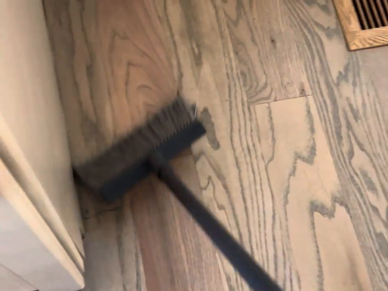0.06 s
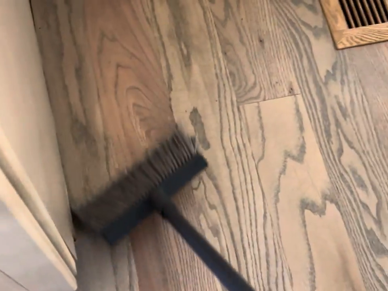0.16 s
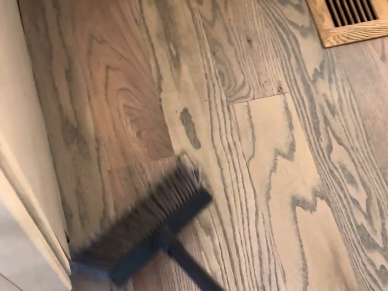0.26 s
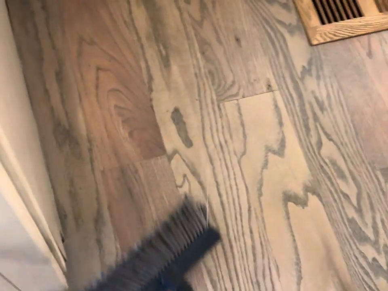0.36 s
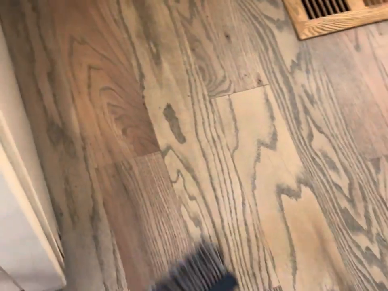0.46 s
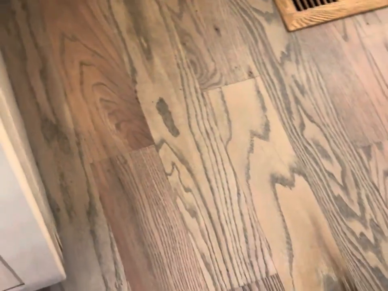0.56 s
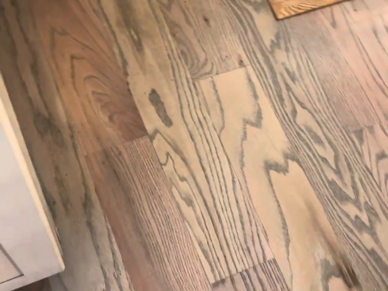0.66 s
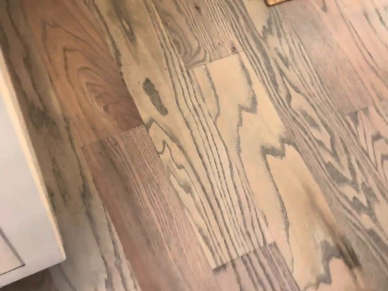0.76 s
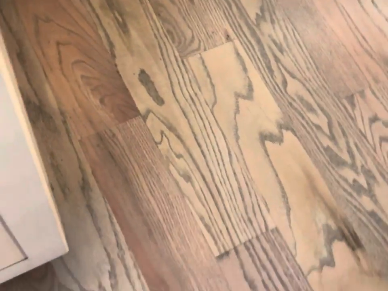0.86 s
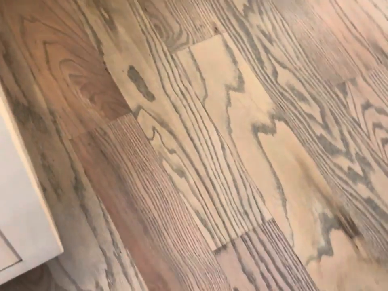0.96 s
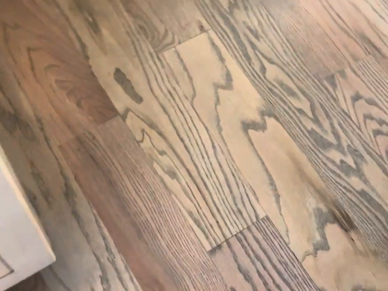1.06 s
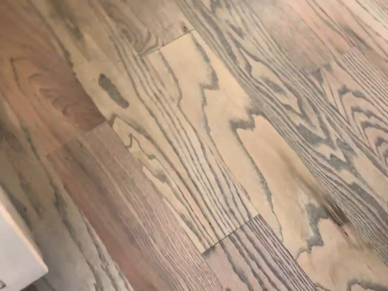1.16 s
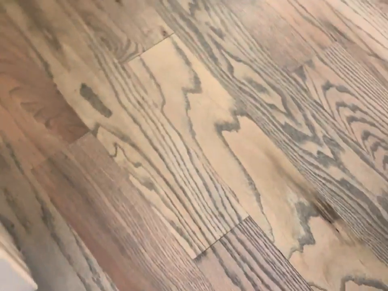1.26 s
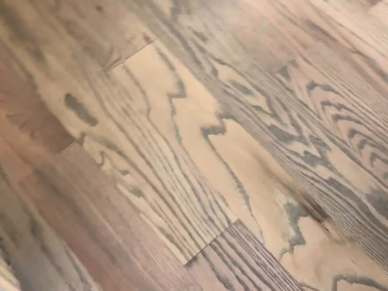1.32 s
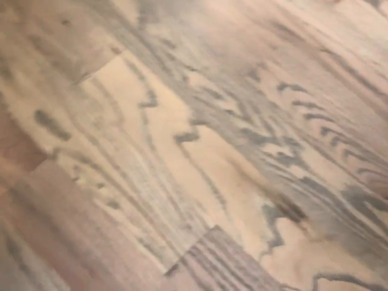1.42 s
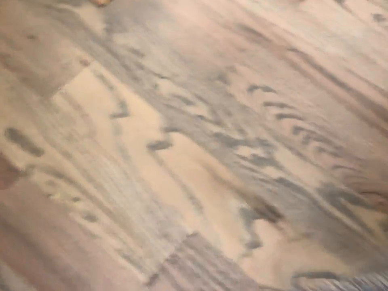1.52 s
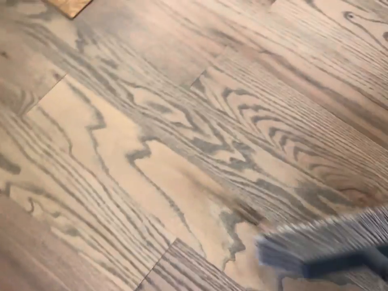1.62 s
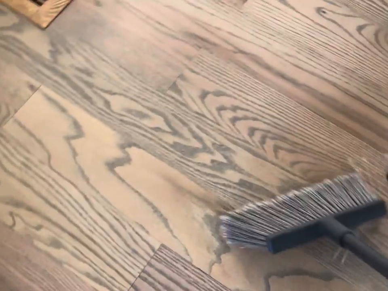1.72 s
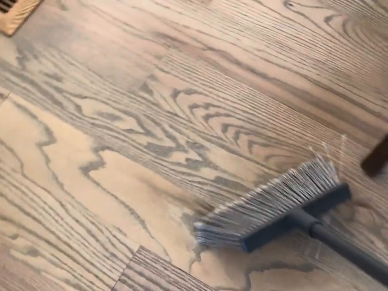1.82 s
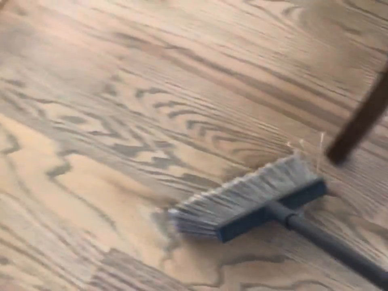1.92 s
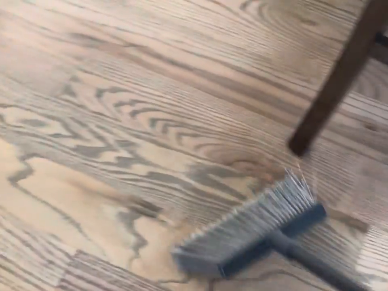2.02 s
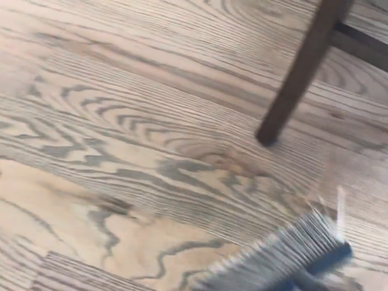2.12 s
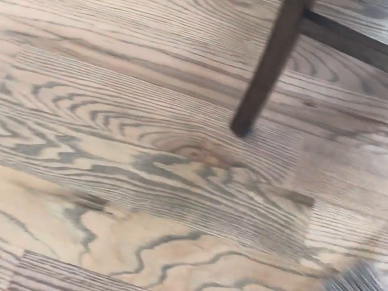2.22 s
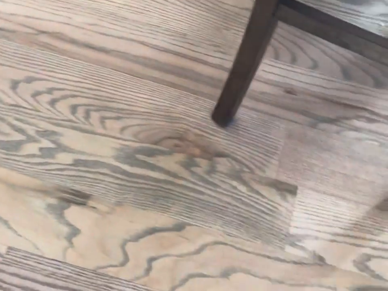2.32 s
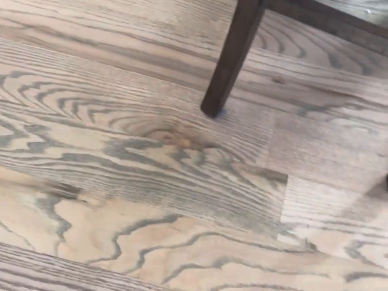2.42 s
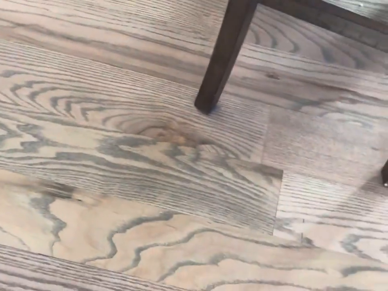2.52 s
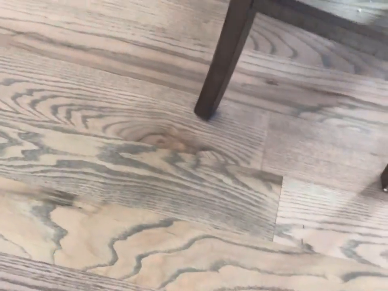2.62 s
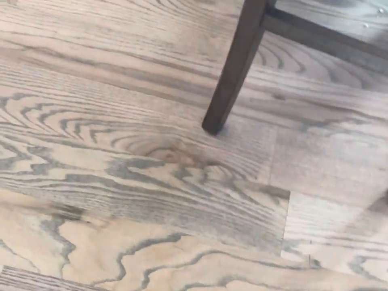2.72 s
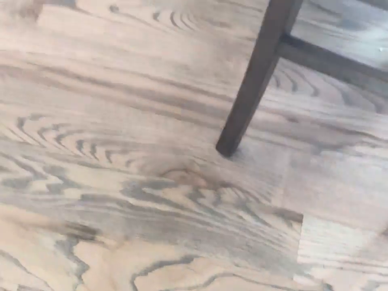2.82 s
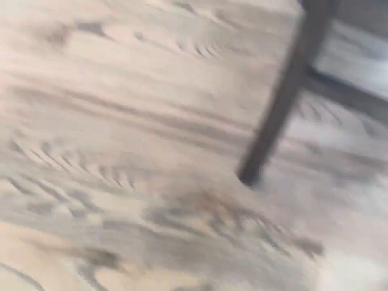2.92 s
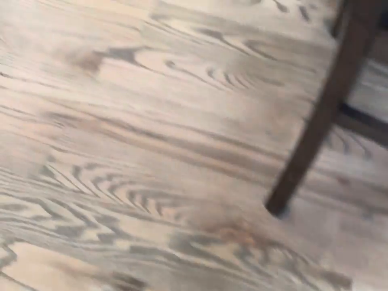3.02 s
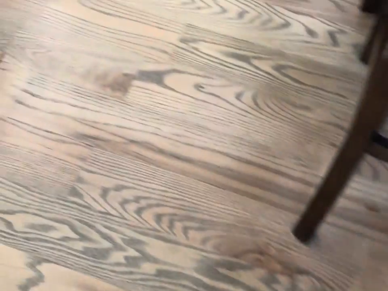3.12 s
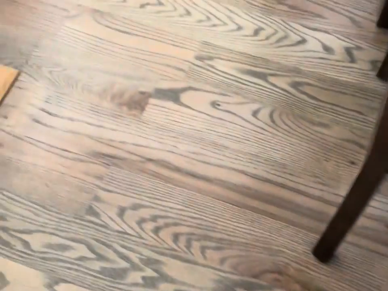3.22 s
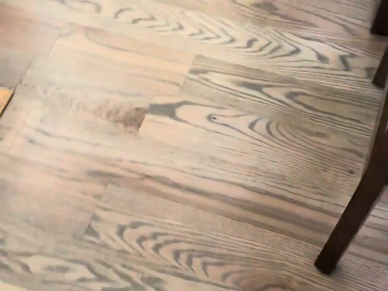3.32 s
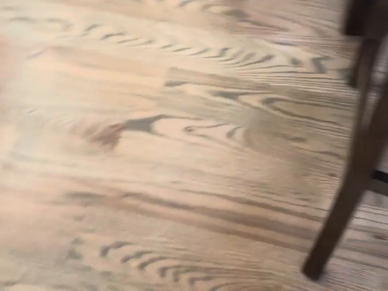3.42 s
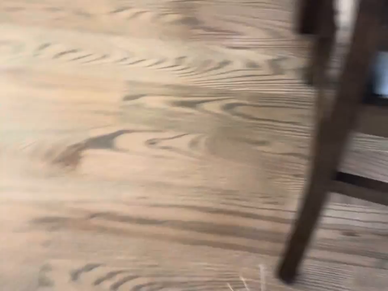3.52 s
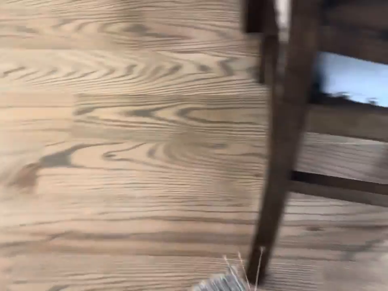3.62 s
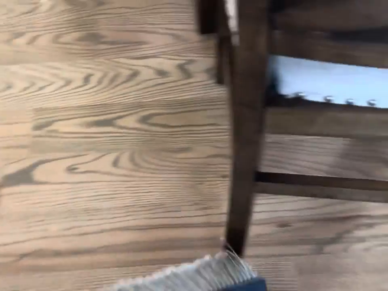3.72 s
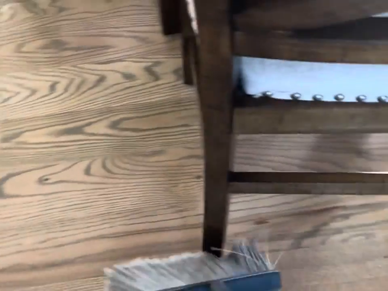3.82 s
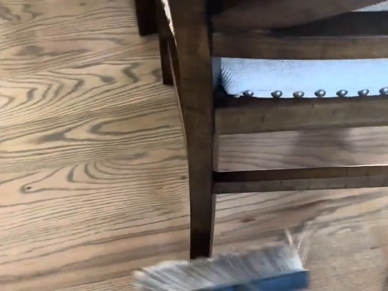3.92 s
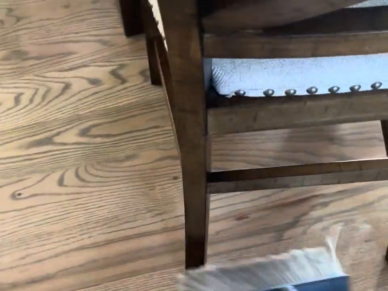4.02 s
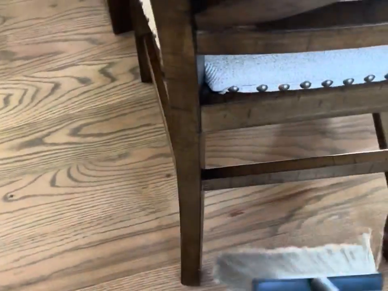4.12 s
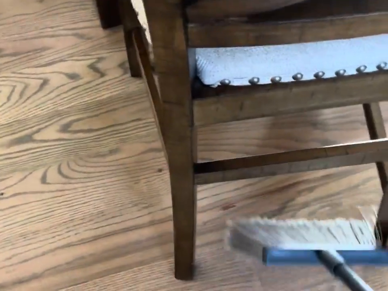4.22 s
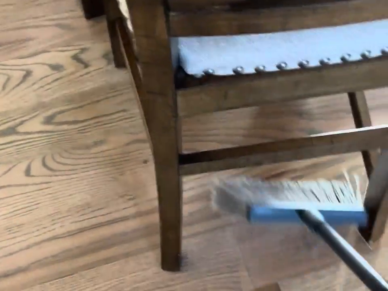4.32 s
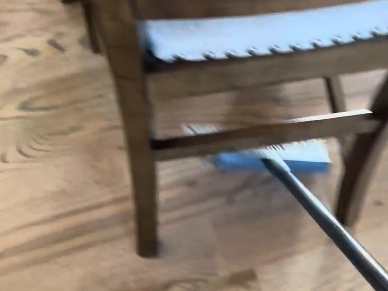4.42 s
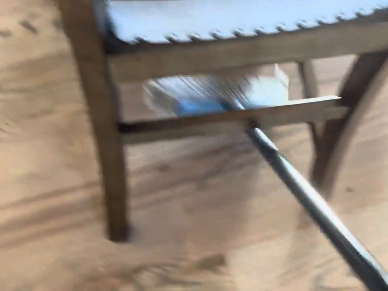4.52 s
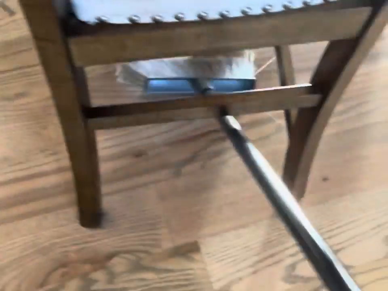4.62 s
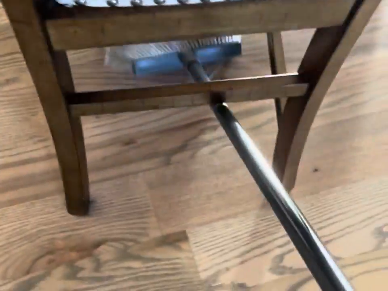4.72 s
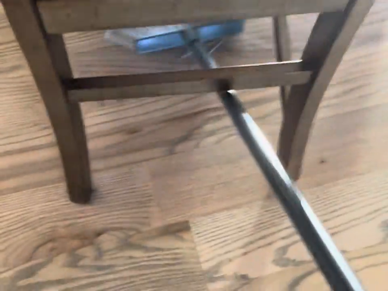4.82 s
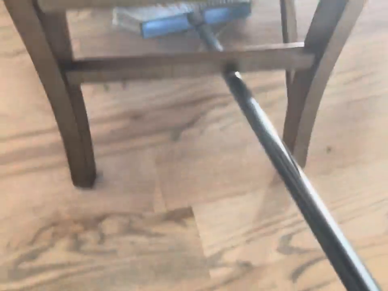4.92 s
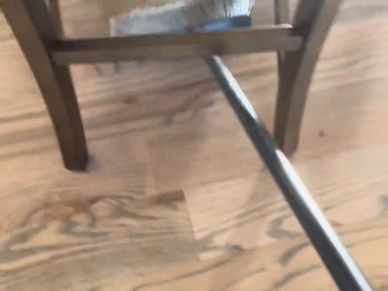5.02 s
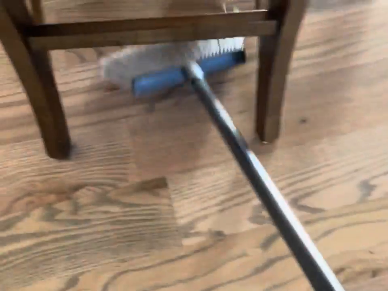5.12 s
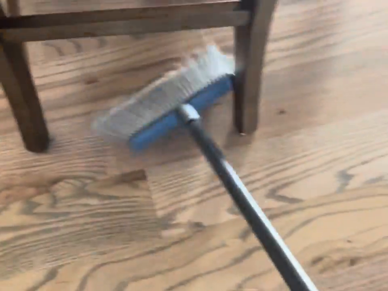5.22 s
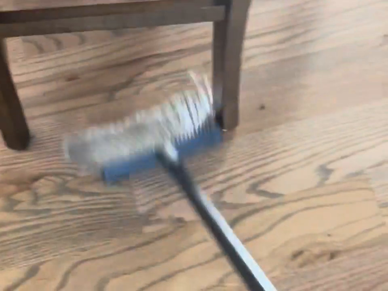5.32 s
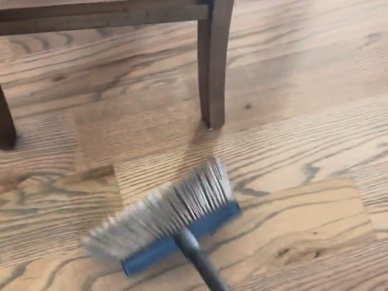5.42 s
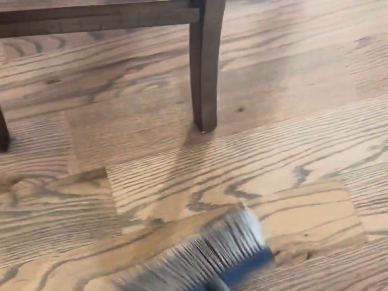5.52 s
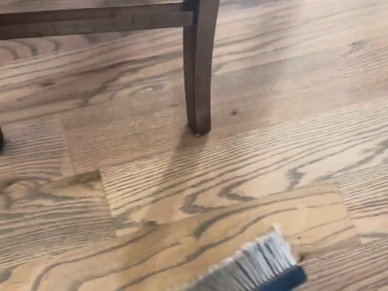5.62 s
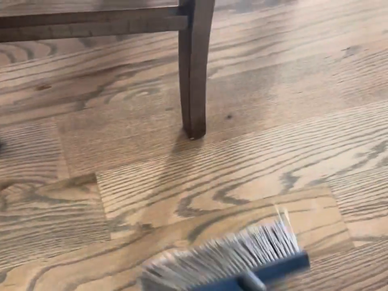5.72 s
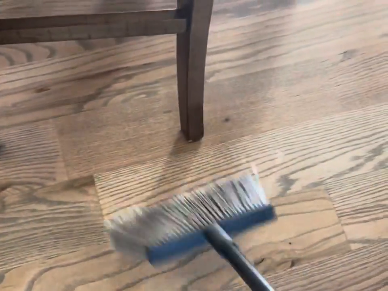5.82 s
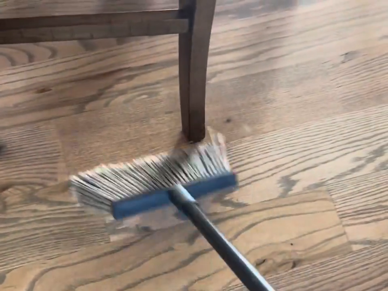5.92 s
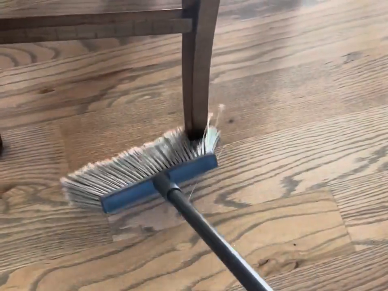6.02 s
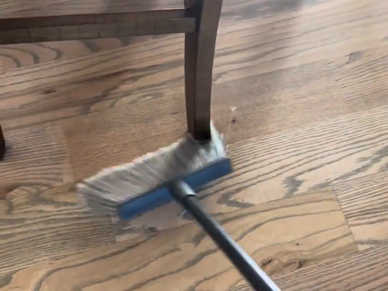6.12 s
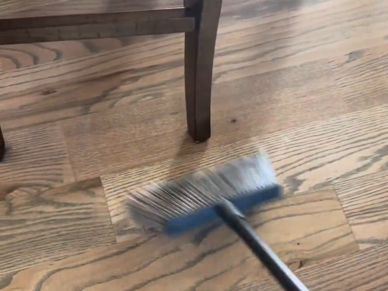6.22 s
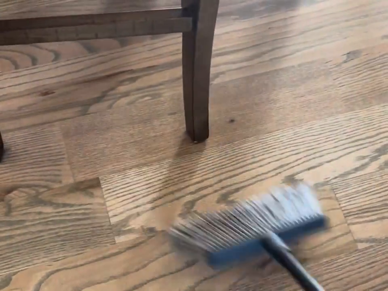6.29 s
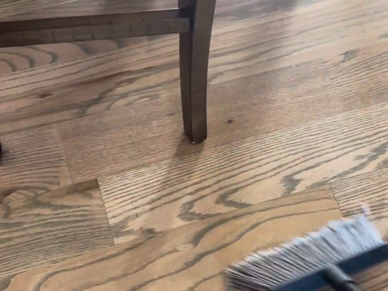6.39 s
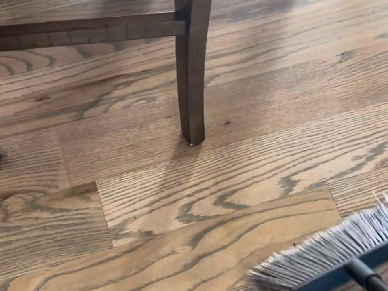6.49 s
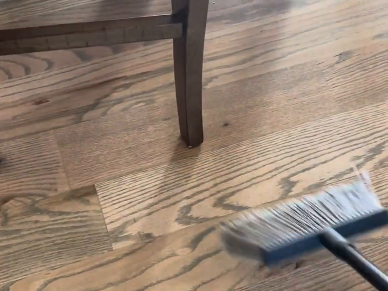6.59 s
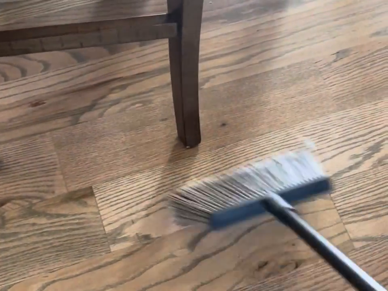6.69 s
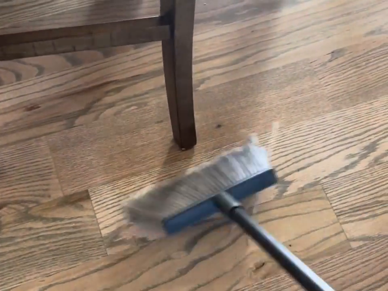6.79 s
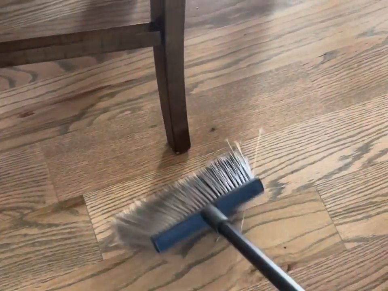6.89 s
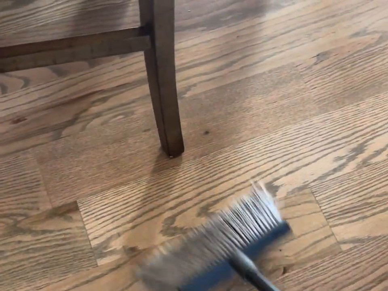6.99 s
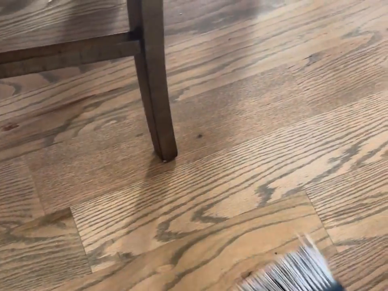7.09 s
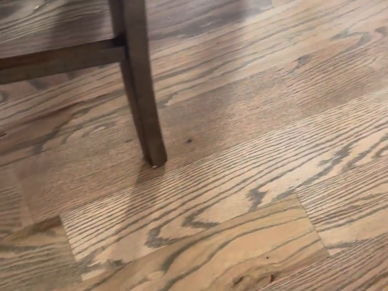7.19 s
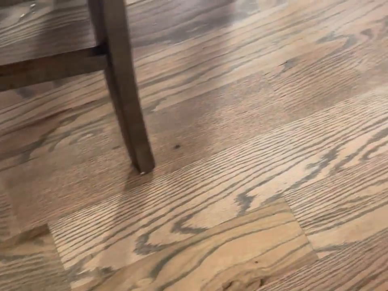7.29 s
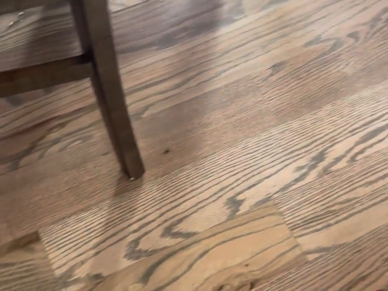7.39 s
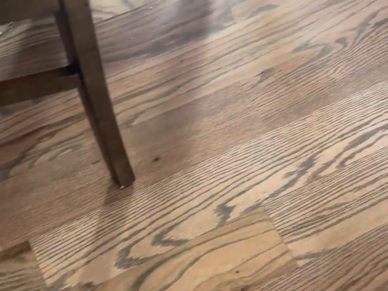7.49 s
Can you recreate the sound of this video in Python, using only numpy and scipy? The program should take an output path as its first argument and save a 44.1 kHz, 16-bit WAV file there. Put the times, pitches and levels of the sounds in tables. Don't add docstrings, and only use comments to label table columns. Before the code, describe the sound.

A soft broom swishes across a hardwood floor in short strokes, then knocks hard against a wooden chair with low booms before sweeping on.

```python
import sys
import numpy as np
from scipy import signal
from scipy.fft import rfft, irfft, next_fast_len
from scipy.io import wavfile
from scipy.ndimage import uniform_filter1d

SR = 44100
rng = np.random.default_rng(int(sys.argv[2]) if len(sys.argv) > 2 else 0)


def undo_db(level):
    steps = np.asarray(level, float) / 20
    return 10 ** steps


def generate_wav(signal):
    frames = np.transpose(np.atleast_2d(signal))
    scaled = np.clip(frames, -1, 1) * 32767
    pcm = np.round(scaled).astype(np.int16)
    wavfile.write(sys.argv[1], SR, pcm)


N = 332954
SIZE = next_fast_len(N)
HZ = np.fft.rfftfreq(SIZE, 1 / SR) + 1e-3
T = np.arange(N) / SR

# [start_s, pull_s, land_db, lift_db, lift_fade_20db_s]
DRAG_EVENTS = [(0.0, 0.2404, -65.5, -68, 0.1566), (.3, 0.647, -72, -60.5, .1),
               (1.41, 0.037, -92.5, -80.5, 0.22), (1.705, 0.0967, -73, -69.5, 0.0446),
               (1.85, 0.134, -88.5, -82, 0.01), (1.99, 0.4835, -77, -59.5, 0.095),
               (3.76, 0.0586, -91.5, -74.5, 0.1631), (4.12, 0.059, -100, -87, 0.09),
               (4.262, 0.256, -78.5, -84, 0.67), (4.5, 0.063, -84.5, -78, 0.14),
               (4.6, 0.132, -69.5, -73, 0.12), (4.955, .25, -78.5, -70, 0.0119),
               (5.29, 0.11, -76.5, -61, 0.1007), (5.45, 0.1734, -71, -71, 0.112),
               (5.93, 0.0734, -89.5, -61, 0.0757), (6.2, 0.179, -74, -71.5, .11),
               (6.93, 0.303, -76.5, -61, 0.1611)]
# [start_s, level_db, fade_20db_s, board_db]
DAB_EVENTS = [(.68, -65, 0.1256, 3), (1.03, -81, 0.61, 11.5), (1.71, -75.5, 0.1024, 11.5),
              (1.995, -80, 0.0673, 13), (2.56, -80.5, 0.3271, 11), (4.27, -85, 0.48, 11),
              (2.97, -88, 0.07, 2), (3.405, -77.5, 0.14, 7), (3.5, -83.5, 0.066, 10.5),
              (3.655, -78.5, 0.03, 9), (4.2, -92.5, 0.67, 0), (4.78, -68, 0.16, -1), (5.24, -72.5, 0.1, 10),
              (6.03, -66, 0.1821, 8.5), (0.0, -67.5, 0.3146, 9.5), (6.165, -64, 0.0468, 4.5),
              (6.63, -95, 0.1, 3), (6.73, -67.5, 0.076, 6), (6.769, -63.5, .17, 7.5),
              (6.98, -70.5, 0.1739, 8)]
# [freq_hz, density_db_per_hz]
BRISTLE_SPECTRUM = [(200, -6), (600, -0.5), (1500, 1), (3000, 3), (4500, -2), (6000, 5), (9000, -1.5),
                    (12000, -2), (16000, -4)]
HISS_DB, BOARD_HZ, SLIPS_PER_S, SLIP_SPREAD_DB = 10.5, 4450, 9000, 1.8
LAND_S, LIFT_CURVE = 0.0066, 1.715
BOARD_DB, BOARD_DB_PER_DB, BOARD_MOST_DB = 3, 0.76, 4
TRAIL_DB, TRAIL_DB_PER_S, TRAIL_BOARD_DB = -26.5, 110, 12

# [start_s, level_db, part_index, crack_db, ring_db]
CHAIR_BLOWS = [(4.5783, -14.5, 0, -27.5, -5.5), (4.606, -29, 0, -36.5, -7), (4.7426, -15.5, 1, -35, -5),
               (4.7785, -23, 1, -22, -6), (5.2255, -7, 2, -33.5, -11.5), (5.981, -52, 2, -20, -7),
               (6.0053, -33, 2, -15.5, -11.5), (6.021, -33, 1, -26, -8.5), (6.776, -38, 0, -16.5, -9),
               (3.486, -47, 2, -21, -12), (6.9865, -46, 2, -21.5, -9.5)]
# [pitch_hz, level_db, t60_s]
PART_MODES = [
    [(229.64, -11, 0.31), (436, -0.5, .07), (729, -11, 0.082), (1170.7, -4.5, 0.0397),
     (1815.6, -8.5, 0.043), (2212.5, -7, 0.0343), (2760, -10.5, 0.033)],
    [(206, -5, 0.3), (252.8, -6, 0.14), (436, 0.5, 0.098), (783.2, -6.5, 0.079), (1030.4, -9, 0.043),
     (2015, -10.5, .04), (2205, -11, .04), (3440, -18.5, .03)],
    [(187.32, -5, 0.168), (320.45, -11.5, 0.172), (587, -17, .06), (759.2, 1.5, 0.077),
     (1419.7, -10.5, 0.033), (2070.6, -5, 0.04), (3391, -12.5, .03)],
]
# [freq_hz, density_db_per_hz]
CLACK_SPECTRA = [
    [(110, -10), (150, -24), (222, 0), (340, -12), (434, 5.5), (600, -10), (741, -4), (950, -18),
     (1250, -25.5), (1800, -14), (2300, -14.5), (2800, -19.5), (4000, -29.5), (6000, -40)],
    [(110, -5.5), (150, -19.5), (222, -4), (420, 1), (800, -9), (950, -19.5), (1240, -10.5), (1550, -24.5),
     (2050, -8.5), (2800, -21.5), (3400, -23), (4900, -28.5), (6000, -37.5)],
    [(110, -7), (208, -8), (270, -12), (400, -4.5), (596, 6), (800, -4.5), (950, -6), (1500, -6.5),
     (2130, 0), (2800, -2), (3600, -7.5), (4200, -18), (5100, -17.5), (7000, -30)],
]
CONTACT_MS = [8.66, 10.5, 9.52]
# [pitch_hz, level_db, t60_s]
FRAME_MODES = [(203.6, -2, 0.48), (223.1, -3.5, 0.344), (361.16, -1, 0.35), (430.64, -1.5, .4),
               (589.6, -13, 0.33), (726.6, 3.5, 0.19), (1205, -36, 0.25), (1779, -13, .4), (2070, -22, .3)]
FRAME_DB = -26.5

# [start_s, peak_db, pitch_hz, ring_over_click_db, brightness_db]
HEAD_TAPS = [(0.5341, -48, 1097, -1, 3), (1.7119, -54.5, 571, -4, -0.5), (2.181, -53, 900, -6, -12),
             (1.8294, -53, 729, 1.5, 2), (1.9938, -50.5, 940, -5, -9.5), (2.2314, -52, 466, -7.5, -9),
             (2.7392, -61, 401, -0.5, -16.5), (3.4115, -60, 587, 4.5, -14), (3.484, -43.5, 515, -5, -20),
             (3.6594, -61.5, 484, -9.5, -15.5), (3.7912, -61, 641, -7, -3.5),
             (4.2655, -57.5, 498, -11.5, -5), (4.4971, -72, 563, -4, -10), (4.519, -55.5, 845, -3.5, -13),
             (4.9356, -41, 1850, -6, -8), (5.0228, -52, 401, -2.5, -4), (5.0831, -47, 1670, -4.5, -9),
             (5.9494, -42, 900, -8, -14), (6.726, -55, 425, -2.5, -9), (6.743, -51.5, 436, 0.5, -5.5),
             (6.776, -39, 1200, 0, -9.5), (6.8506, -46, 423.5, -2.5, -9), (6.9859, -44.5, 701, -4, -7.5)]
# [start_s, peak_db, pitch_hz, ring_over_click_db, brightness_db]
GRIT_CRACKS = [
    (0.5344, -46.5, 5350, 3, 0),
    (2.9711, -62, 3930, 3, -7),
    (3.482, -54, 3920, 3, 0),
    (4.1694, -73.5, 3860, 3, -2.5),
    (4.9346, -43, 5360, 3, -4),
    (6.6332, -55, 5490, 3, -12),
]

# [start_s, peak_db, pitch_hz, t60_s]
JOIST_BOOMS = [(0.491, -56.5, 67.5, 0.19), (1.079, -50.5, 57.7, 0.42), (1.163, -35, 55.1, 0.168),
               (1.938, -48, 52.4, 0.273), (3.418, -46, 82, 0.272), (3.539, -46.5, 63.8, 0.146),
               (4.603, -19.5, 63.4, 0.118), (4.639, -32.5, 53.13, 0.695), (4.749, -30, 84, 0.23),
               (4.841, -45, 70.44, 0.59), (4.919, -42.5, 46.2, 0.26), (5.038, -51, 52.1, 0.248),
               (5.129, -53, 48.2, 0.38), (5.249, -35.5, 91.74, 0.65), (5.27, -25, 54.97, 0.337),
               (5.389, -25.5, 53.15, 0.272), (5.559, -43, 55.5, 0.217), (5.699, -45, 55.6, 0.305),
               (5.979, -44.5, 56.5, 0.68), (6.035, -42, 41.6, 0.43), (6.039, -42, 88.7, 0.39),
               (6.169, -43.5, 57, 0.27), (6.399, -46, 53.92, 0.304)]
SWELL_CYCLES = 1.057

# [freq_hz, t60_s]
ROOM_DECAY = [(100, 0.987), (300, 0.659), (1000, 0.711), (3000, 0.674), (6000, 0.568), (15000, 0.419)]
BLOW_WET_DB, TAP_WET_DB, BRISTLE_WET_DB = -5.5, -9, -8

# [freq_hz, density_db_per_hz]
AIR_SPECTRUM = [(25, -4.5), (45, 6), (90, 0.5), (150, -5), (220, 0.5), (350, -9.5), (800, -12), (1600, -23),
                (3000, -32), (5000, -41.5), (8000, -49), (13000, -54.5), (16000, -57)]
# [time_s, gain_db]
FLOOR_TREMBLE = [(0, -0.5), (4.2, -2.5), (4.8, 5.5), (5.8, 2), (6.5, -6), (7.55, -6)]
AIR_DB, WHINE_HZ, WHINE_DB = -58, 15150, -112

# [freq_hz, likeness_0_to_1]
PORT_LIKENESS = [(60, .999), (130, .993), (300, .8), (700, .3), (1500, .75), (2200, .8), (3000, .5),
                 (4500, .3), (5300, .65), (5800, .93), (16000, .93)]
# [freq_hz, lead_half_turns]
PORT_LEAD = [(0, 0), (400, -.05), (900, -.2), (1700, -.1), (2900, .95), (4300, .25), (5300, .65),
             (5900, .95), (6500, 1.07), (8700, 1.92), (9700, 2.06), (11800, 2.93), (13300, 3.06),
             (15000, 3.95), (22050, 4.3)]


def bristles():
    pressure, board_db = strokes()
    slips = (rng.random((2, N)) < SLIPS_PER_S / SR) * rng.standard_normal((2, N))
    slip_size = np.minimum(rng.exponential(size=(2, N)), 3)
    slips = level(colour(slips * undo_db(SLIP_SPREAD_DB * slip_size), BRISTLE_SPECTRUM), 0)
    board = butter(slips, BOARD_HZ)
    tips = slips - board + board * undo_db(board_db + walk(24))
    treble = butter(tips, 8000, "high")
    tips = (tips - treble) * undo_db(1.2 * walk(25)) + treble * undo_db(1.2 * walk(25))
    return tips * pressure * undo_db(HISS_DB + 0.8 * walk(35))


def strokes():
    t = T[::44]
    tips, board = np.full(len(t), 1e-12), np.full(len(t), 1e-12)
    for start_s, pull_s, land_db, lift_db, fade_s in DRAG_EVENTS:
        after_s = np.maximum(t - start_s - pull_s, 0)
        drag_db = np.interp(t, [start_s, start_s + pull_s], [land_db, lift_db])
        drag_db = drag_db - 20 * (after_s / fade_s) ** LIFT_CURVE
        landing = np.clip((t - start_s) / LAND_S + (start_s <= 0), 0, 1)
        power = undo_db(2 * drag_db) * landing ** 2
        trail = undo_db(2 * (lift_db + TRAIL_DB - TRAIL_DB_PER_S * after_s)) * (after_s > 0)
        board_db = np.minimum(BOARD_DB - BOARD_DB_PER_DB * (drag_db + 70), BOARD_MOST_DB)
        tips += power + trail
        board += power * undo_db(2 * board_db) + trail * undo_db(2 * TRAIL_BOARD_DB)
    for start_s, level_db, fade_s, board_db in DAB_EVENTS:
        dab_db = level_db - 20 * np.maximum(t - start_s, 0) / fade_s
        power = undo_db(2 * dab_db) * np.clip((t - start_s) / LAND_S, 0, 1) ** 2
        tips += power
        board += power * undo_db(2 * board_db)
    return np.interp(T, t, np.sqrt(tips)), np.interp(T, t, 10 * np.log10(board / tips))


def chair():
    out, size = np.zeros(N), SR // 2
    frame = sum(undo_db(db) * ring(hz, t60_s, size) for hz, db, t60_s in FRAME_MODES)
    onset = 1 - np.exp(-T[:size] / 0.00042)
    for start_s, level_db, part, crack_db, ring_db in CHAIR_BLOWS:
        part = int(round(part))
        chance = rng.standard_normal(4096)
        near = np.zeros(size)
        for k, (hz, db, t60_s) in enumerate(PART_MODES[part]):
            near += (-1) ** k * undo_db(db) * knock(hz, t60_s, size)
        blow = (undo_db(ring_db) * near / abs(near).max() + undo_db(FRAME_DB) * frame) * onset
        crack = undo_db(crack_db) * chance[::-1] * np.exp(-T[:4096] / 0.0037)
        blow[:4096] += rattle(chance, CONTACT_MS[part], CLACK_SPECTRA[part]) + crack
        add(out, start_s, undo_db(level_db) * blow)
    return butter(out, 130, "high")


def rattle(chance, contact_ms, spectrum):
    size = len(chance)
    burst = rfft(chance * np.exp(-(T[:size] * 1000 / contact_ms) ** 2))
    burst /= np.sqrt(uniform_filter1d(abs(burst) ** 2, size=9))
    hz = np.fft.rfftfreq(size, 1 / SR) + 1
    cepstrum = irfft(np.log(undo_db(np.maximum(curve(spectrum, hz), -60))))
    cepstrum[1:size // 2] *= 2
    cepstrum[size // 2 + 1:] = 0
    clack = irfft(burst * np.exp(rfft(cepstrum)))
    return clack / abs(clack).max()


def knock(hz, t60_s, size):
    build = 1 - np.exp(-(T[:size] * hz / 2.5) ** 2)
    return ring(hz, min(t60_s, 90 / hz), size) * build


def taps():
    out, size = np.zeros(N), 1024
    for start_s, peak_db, hz, ring_db, bright_db in list(HEAD_TAPS) + list(GRIT_CRACKS):
        chance = rng.standard_normal(size)
        dull = butter(chance, [700, 4500], "band")
        crackle = (dull + undo_db(bright_db) * (chance - dull)) * np.exp(-T[:size] / 0.0038)
        wood = undo_db(ring_db) * ring(hz, min(0.04, 30 / hz), size)
        add(out, start_s, undo_db(peak_db) * (crackle + wood))
    return out


def joists():
    out = np.zeros(N)
    for start_s, peak_db, hz, t60_s in JOIST_BOOMS:
        swell = 1 - np.exp(-(T[:SR] * hz / SWELL_CYCLES) ** 2)
        add(out, start_s, 1.558 * undo_db(peak_db) * ring(hz, t60_s, SR) * swell)
    return out


def room(x):
    t, tail = T[:SR], 0
    f = np.fft.rfftfreq(SR, 1 / SR) + 1
    noise = rfft(rng.standard_normal((2, SR)))
    for hz in 50 * 2 ** np.arange(0, 9, 0.5):
        band = np.clip(1 - 2 * abs(np.log2(f / hz)), 0, 1)
        fade = np.exp(-np.log(1000) * t / curve(ROOM_DECAY, hz))
        tail = tail + irfft(noise * band, SR) * fade
    tail *= 1 - np.exp(-(t / 0.004) ** 2)
    tail /= np.sqrt(np.sum(tail ** 2) / 2)
    return signal.fftconvolve(x[None], tail, axes=1)[:, :N]


def hum():
    air = level(colour(rng.standard_normal((2, N)), AIR_SPECTRUM), AIR_DB)
    rumble = signal.sosfiltfilt(signal.butter(2, 110, fs=SR, output="sos"), air)
    air = air - rumble + rumble * undo_db(np.interp(T, *np.transpose(FLOOR_TREMBLE)))
    whine = undo_db(WHINE_DB + 5 * walk(9)) * np.sin(2 * np.pi * WHINE_HZ * T)
    return air + whine


def ring(hz, t60_s, size):
    t = T[:size]
    return np.sin(2 * np.pi * hz * t) * np.exp(-np.log(1000) * t / max(t60_s, 1e-3))


def walk(rate_hz):
    k = int(SR / rate_hz)
    held = np.repeat(rng.standard_normal(N // k + 1), k)
    return 1.3 * uniform_filter1d(uniform_filter1d(held, k), k)[:N]


def butter(x, hz, kind="low"):
    return signal.sosfilt(signal.butter(2, hz, kind, fs=SR, output="sos"), x)


def curve(table, hz):
    return np.interp(np.log(hz), np.log([r[0] for r in table]), [r[1] for r in table])


def colour(x, spectrum):
    return irfft(rfft(x, SIZE) * undo_db(curve(spectrum, HZ)), SIZE)[..., :N]


def level(x, rms_db):
    return x * undo_db(rms_db) / np.sqrt(np.mean(x ** 2))


def add(track, start_s, x):
    i = int(start_s * SR)
    track[i:i + len(x)] += x[:N - i]


def scene():
    sweep, blows, light = bristles(), chair(), taps()
    hits = blows + light
    wet = room(undo_db(BRISTLE_WET_DB) * sweep[0] + undo_db(BLOW_WET_DB) * blows + undo_db(TAP_WET_DB) * light)
    echo = np.roll(hits, 31)
    direct = sweep + np.array([hits, 0.7 * echo])
    return direct + wet + joists() * [[1], [0.8]] + hum()


def roll_off(x):
    return signal.sosfilt(signal.butter(12, 16630, fs=SR, output="sos"), x)


def record(dry):
    shared, other = rfft(dry, SIZE)
    like = np.clip(curve(PORT_LIKENESS, HZ), 0, 1)
    shared = np.sqrt((1 + like) / 2) * shared
    other = np.sqrt((1 - like) / 2) * other
    turn = np.exp(0.5j * np.pi * np.interp(HZ, *np.transpose(PORT_LEAD)))
    ports = irfft([(shared + other) * turn, (shared - other) / turn], SIZE)[:, :N]
    ports = signal.sosfilt(signal.ellip(8, 0.2, 32, 15750, fs=SR, output="sos"), ports)
    return roll_off(ports)


dry = scene()
out = record(dry)
generate_wav(out)
```